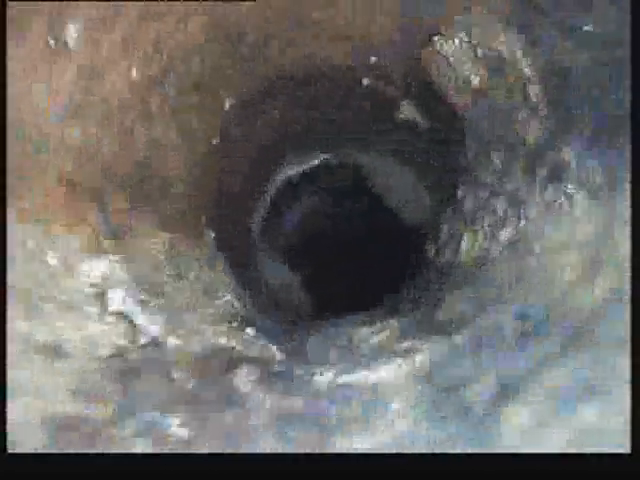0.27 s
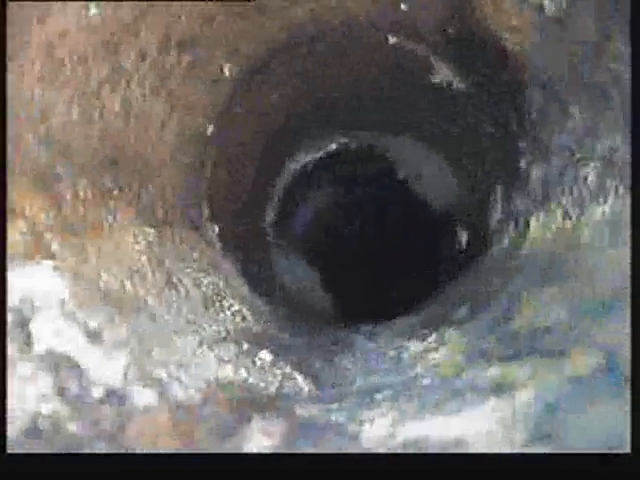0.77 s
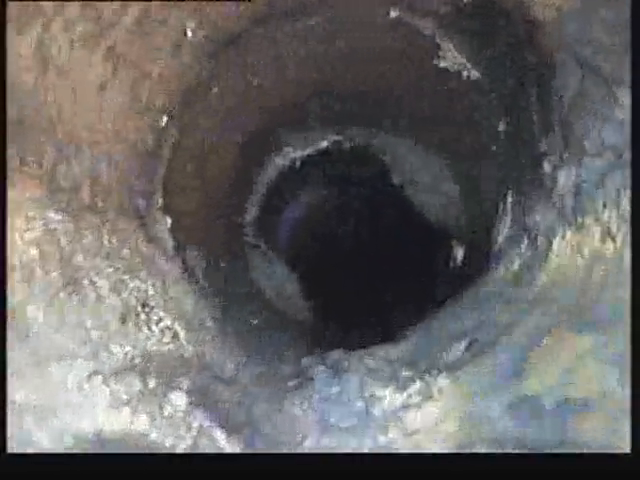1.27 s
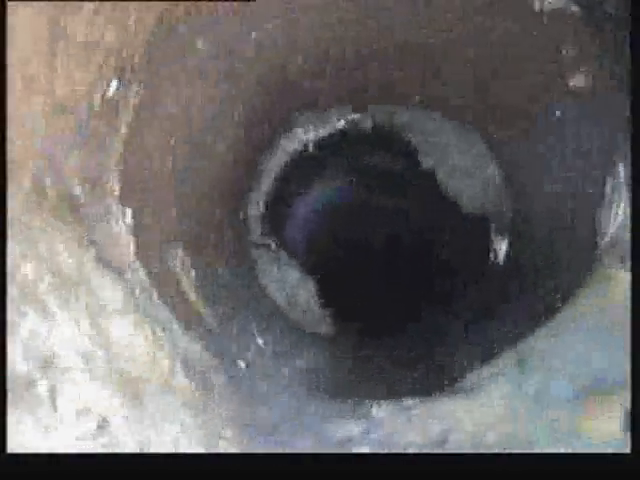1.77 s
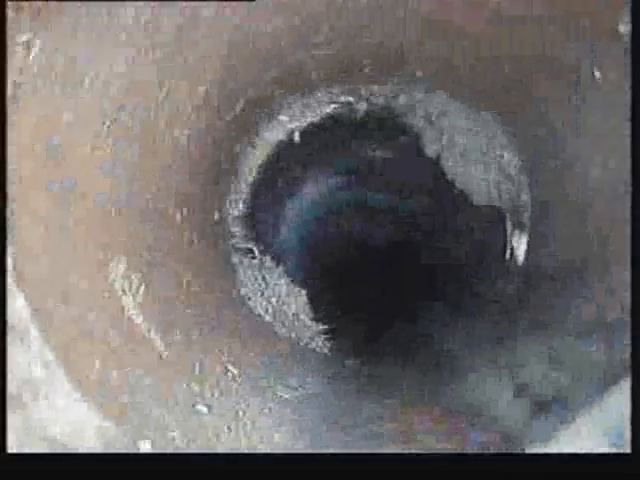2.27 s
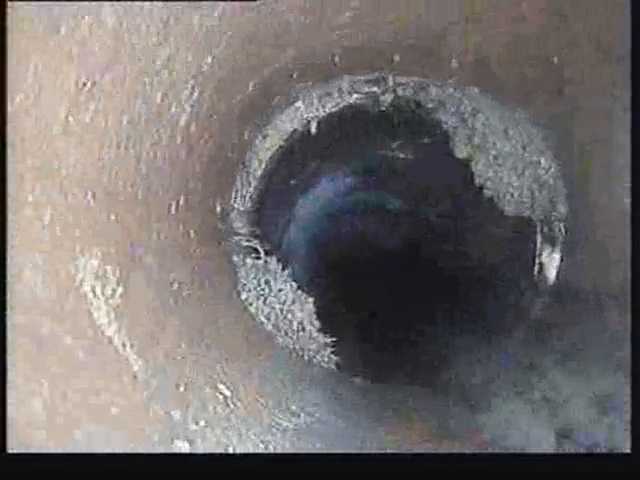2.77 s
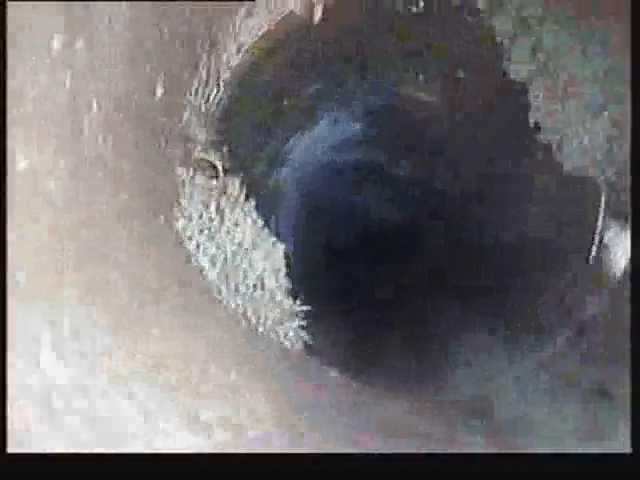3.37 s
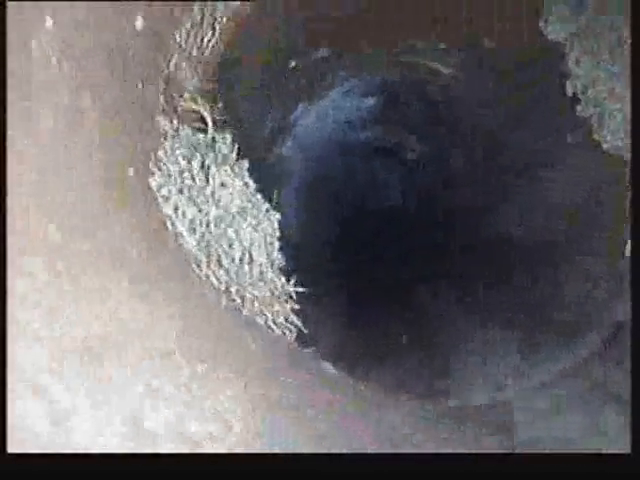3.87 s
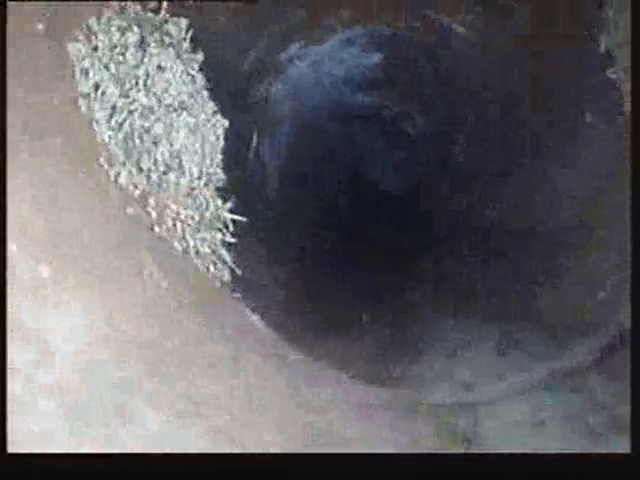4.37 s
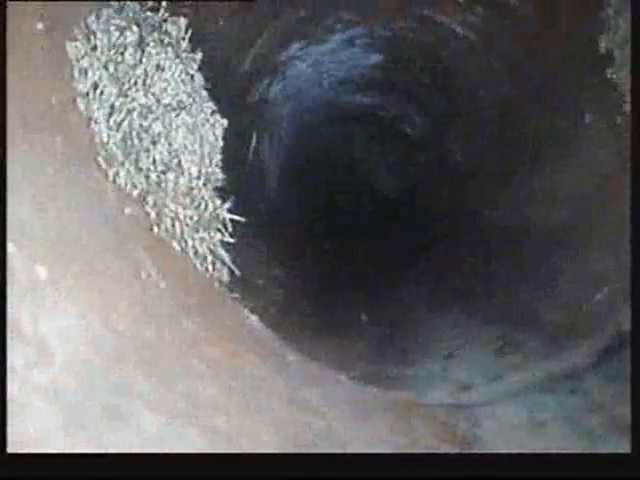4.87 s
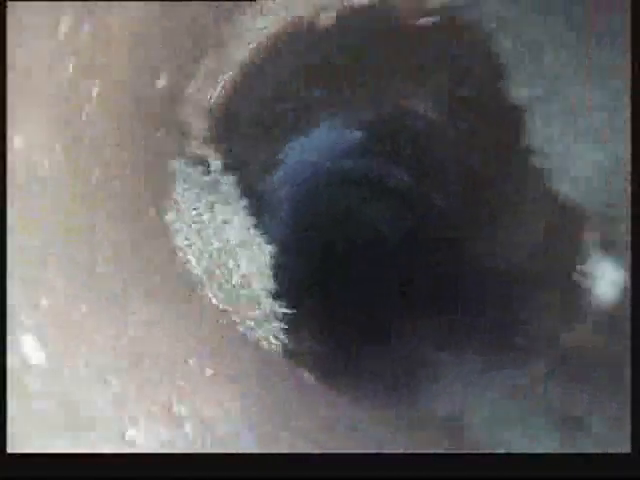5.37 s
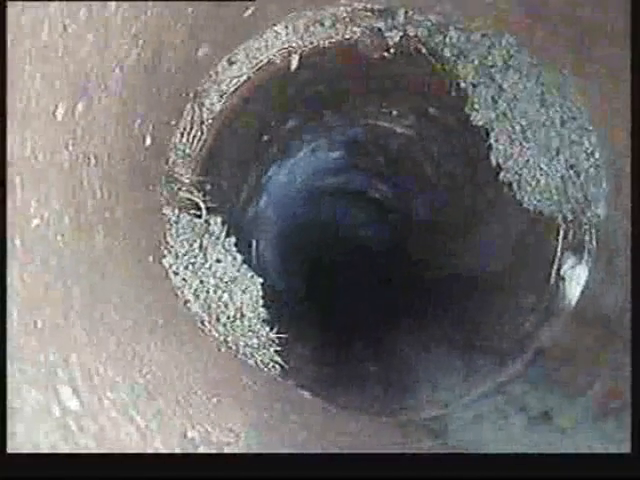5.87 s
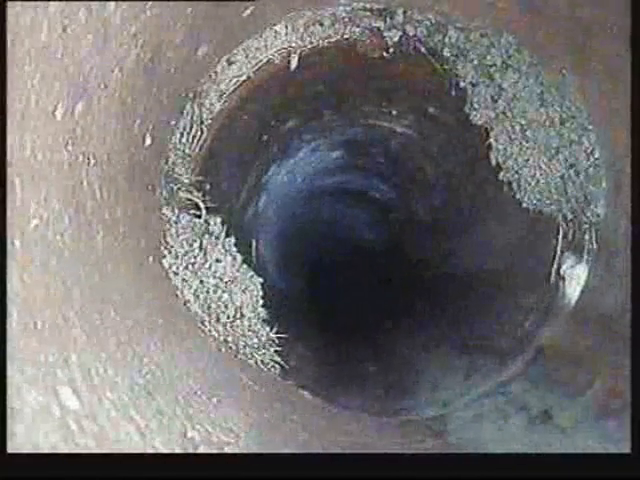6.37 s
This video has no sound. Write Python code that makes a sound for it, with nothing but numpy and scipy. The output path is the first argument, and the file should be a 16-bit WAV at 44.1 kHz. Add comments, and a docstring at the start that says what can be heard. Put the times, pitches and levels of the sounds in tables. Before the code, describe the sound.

Inside a pipe-inspection camera, only electrical leakage is heard: a thin high whine holds nearly steady over soft hiss and a faint buzzy bed of tones. Two or three times a second it drops briefly in a stuttering chirp. Tiny clicks patter rapidly. Later the whine roughens into a fast flutter. Everything is very quiet, dry, and direct, with no room, water or scraping.

```python
"""Inside a pipe-inspection camera, at its audio input: electrical leakage only, nothing acoustic, so no distance.
A switching supply whines and sags in pitch whenever the electronics draw current, in bursts and once a frame.
A digital tick train folds down into thin lines, beside lone steady clock tones; each line is a summed sine.
Picture fields click as short spikes, faint low noise comes and goes in short swells, and shaped noise
hisses on a DC offset."""
import sys
import numpy as np
from scipy import signal
from scipy.fft import rfft, irfft, next_fast_len
from scipy.io import wavfile
from scipy.ndimage import uniform_filter1d

SR = 44100
rng = np.random.default_rng(int(sys.argv[2]) if len(sys.argv) > 2 else 0)


def output_pcm(signal):
    """Save a mono or channel-first signal as 16-bit PCM at the path in sys.argv[1].

    Samples are clipped to [-1, 1] before scaling.
    """
    pcm = np.clip(np.atleast_2d(signal).T, -1, 1) * 32767
    wavfile.write(sys.argv[1], SR, np.round(pcm).astype(np.int16))


N = 292414

# The supply's drift. Each row: time in seconds, pitch at rest in Hz before any rebound,
# basic sag under the load of each frame in Hz (below zero counts as none).
SUPPLY_DRIFT = [(0, 2577, -0.5), (.8, 2588, 0), (.86, 2598, 0.5), (1.1, 2606, 0), (1.17, 2614, 0.5),
                (1.48, 2611, 0), (1.92, 2612, 0), (1.98, 2620, 0), (2.36, 2627, 0), (2.72, 2624, 0),
                (2.78, 2640, 18), (3.36, 2663, 32), (3.65, 2661, 16), (4.26, 2660, 33), (4.76, 2666, 29.5),
                (5.16, 2676, 46), (5.45, 2677, 72), (5.96, 2685, 88), (6.14, 2676, 122),
                (6.63, 2640, 114.5)]
# Bursts of heavy load, three equal steps each. Each row: start in seconds, length in ms,
# share of its load (0-1) that a step draws at first, full sag of steps one, two and three in Hz before stutter,
# extra sag of the frames just after in Hz.
LOAD_BURSTS = [(-0.0025, 34.0, 0.55, 99, 13.0, 136, 0.0), (0.368, 31.0, 0.37, 17.0, 150, 73, -2),
               (0.81, 34.0, 0.34, 163, 146, 114, 0.5), (1.119, 33.0, 0.7, 155, 6.1, 125, -0.5),
               (1.494, 37.0, 0.85, 43, 116, 11.8, 0.0), (1.93, 34.0, 0.12, 160, 196, 217, 0.5),
               (2.3724, 33.0, 0.65, 77.0, 212.0, 118, -1), (2.733, 31.5, 0.84, 80, 185, 95.0, 3.0),
               (3.0104, 32.5, 0.4, 300, 230, 280, 26.0), (3.3694, 34.5, 0.83, 160, 209.0, 186.0, 35.5),
               (3.813, 31.0, 0.85, 111.0, 247.0, 133.0, 12.0), (4.2755, 35.5, 0.87, 223.0, 76, 173, 32.0),
               (4.7724, 36.5, 0.71, 200, 251.0, 134, 30.0), (5.1713, 37.5, 0.84, 135, 288.0, 65, 30.0),
               (5.685, 35.0, 0.55, 213, 230, 300, 24.0), (5.9715, 34.5, 0.85, 192.0, 260.0, 261.0, 5.0),
               (6.2743, 36.0, 0.9, 271.0, 185, 224, 0.5), (6.569, 34.0, 0.7, 260, 240, 270.0, 0.0)]
# Partials of the whine and its beats with fixed clocks. Each row: multiple of the pitch, clock in Hz.
WHINE_PARTIALS = [(1, 0), (2, 0), (3, 0), (-1, 12100.6), (-2, 12100.6), (1, 3897.6), (-1, 3897.6),
                  (1, 7799.2), (1, 8197.9), (-1, 11702), (-2, 16000.2), (1, 4300.3)]
# Level of each partial in dB rms, before the flicker.
PARTIAL_DB = [-48.5, -67, -81, -70.5, -103, -74, -73.5, -78, -78, -81, -73, -88]
# The tick harmonics fold into combs. Each entry: the shift of one comb in Hz.
COMB_SHIFT_HZ = [0, 68.6, 197.2, 211.2, 110.2, 96.4]
# Line levels along each comb, one list per comb. Each row: frequency in Hz, level in dB rms.
COMB_SHAPES = [
    [(250, -73), (550, -73), (1100, -78), (1600, -86), (2200, -86)],
    [(300, -83), (600, -80), (1700, -82), (2300, -84), (3500, -86), (4000, -88)],
    [(190, -75), (500, -77), (800, -80), (1300, -80), (3100, -82), (5000, -89)],
    [(200, -82), (2900, -81), (3700, -81), (4200, -74), (4750, -79), (5000, -86), (5250, -80), (5500, -82),
     (6900, -83), (9000, -91)],
    [(7000, -90), (8300, -87), (10000, -88), (11200, -89), (11700, -85), (12100, -91), (12600, -94)],
    [(6700, -88), (7300, -90), (7800, -86), (8700, -92)],
]
# Lone steady clock tones. Each entry: frequency in Hz.
CLOCK_TONE_HZ = [325.8, 375, 400, 750, 1125, 1342.7, 4000.6, 5440.6, 5681.6, 6056.6, 8198.4, 9945.7,
                 10561.8]
# Level of each clock tone in dB rms.
CLOCK_TONE_DB = [-82.5, -73.5, -84, -79.5, -86, -81, -83, -76, -87, -75, -81, -78.5, -89]
# Spectrum of the hiss. Each row: frequency in Hz, relative density in dB per Hz.
HISS_SPECTRUM = [(60, -30), (85, 1), (150, -55), (190, 1.5), (400, 0), (1000, -2.5), (2000, -2.5),
                 (4000, -4), (7000, -6), (10000, -10.5), (12000, -11.5), (12700, -15)]
# Short swells of faint low noise, most of them near the bursts.
# Each row: centre in seconds, level at the centre in dB rms.
LOW_NOISE_SWELLS = [(.03, -65), (.38, -70), (.83, -61), (1.14, -60), (1.51, -58.5), (1.96, -62),
                    (2.17, -68), (2.39, -58.5), (2.76, -68), (2.89, -72), (3.03, -62), (3.39, -66),
                    (3.5, -62), (3.85, -63), (4.29, -69), (4.42, -69), (4.78, -61.5), (4.92, -68),
                    (5.18, -62.5), (5.59, -68), (5.72, -70.5), (5.99, -65), (6.29, -61), (6.47, -65),
                    (6.59, -62)]

FRAME_S, FRAME_START_S = .04, .0085
# A frame's load is a long task, a pause and a short task (mean share of the frame, its spread, then shares).
LONG_TASK, LONG_TASK_SPREAD, PAUSE, SHORT_TASK = .45, .0588, .066, .09
WEIGHT_SPREAD = .219  # how much the load differs from frame to frame (share)
RIPPLE_HZ, RIPPLE_SHARE = 94.3, .29
SETTLE_S, JITTER_HZ = .00039, 14.4  # length of each load smoothing; rms wander of the pitch
FULL_LOAD_FROM = .6  # a burst step draws its full load after this point (share of the step)
STUTTER_LO_HZ, STUTTER_HI_HZ, STUTTER_SHARE = 90, 300, .33
# After a burst the whine rests higher and the frames weigh differently; both fade.
REBOUND_HZ, REBOUND_S, BACKLOG_S = 14, .22, .16
WHINE_FLICKER_DB = .33
TICK_HZ, TICK_START_S, TICK_SCATTER_DB = 265.772, .00094, -43
HISS_DB, HISS_FLICKER_DB = -56.5, 1.5  # rms before the flicker; rms of the flicker
# Click heights are in dB of full scale, ahead of the top cut.
FIELD_HZ, FIELD_START_S = 59.949, -.0002
FIELD_DB, FIELD_SCATTER_DB = -51, 5.5
# A field clicks loudly on one part of the tick cycle (shares), most so at the top of a slow cycle.
LOUD_FROM, LOUD_TO = .63, .835
LOUD_DB, LOUD_SWELL_DB, LOUD_SCATTER_DB = -42.5, 8, 1.4
SWELL_S, SWELL_TOP_S = 1.0009, .42
LEAD_SHARE, LEAD_S = .19, .0002  # size and lead of the spike ahead of each click
LOW_SWELL_S, LOW_NOISE_LO_HZ, LOW_NOISE_HI_HZ = .018, 76, 258
OFFSET = .0284  # share of full scale
TOP_HZ = 12760


def undb(db):
    """Decibels to gain."""
    return 10 ** (np.asarray(db) / 20)


def level(x, db):
    """Scale to an rms level in dB."""
    return x * undb(db) / np.sqrt(np.mean(x ** 2))


def band(x, lo_hz, hi_hz):
    """Band-pass with second-order slopes."""
    return signal.sosfilt(signal.butter(2, [lo_hz, hi_hz], "band", fs=SR, output="sos"), x)


def band_noise(lo_hz, hi_hz):
    """Random wander within a band, at an rms of one."""
    return level(band(rng.standard_normal(N), lo_hz, hi_hz), 0)


def spikes(times, sizes):
    """One impulse at each time."""
    out = np.zeros(N)
    samples = np.clip((np.asarray(times) * SR).astype(int), 0, N - 1)
    np.add.at(out, samples, sizes)
    return out


def tone(phase, db):
    """A sinusoid of given rms level."""
    return np.sqrt(2) * undb(db) * np.cos(phase)


def burst_sag(t):
    """Sag in Hz under the bursts: each step starts on part of its load, bites fully at its end, and stutters."""
    sag_hz = np.zeros(N)
    for start, ms, first_share, *steps_hz, _ in LOAD_BURSTS:
        step, place = np.divmod((t - start) / ms * 1000 * len(steps_hz), 1)
        share = np.where(place > FULL_LOAD_FROM, 1, first_share)
        sag_hz += share * sum(hz * (step == k) for k, hz in enumerate(steps_hz))
    return sag_hz * (1 + STUTTER_SHARE * band_noise(STUTTER_LO_HZ, STUTTER_HI_HZ))


def since_burst(t):
    """Seconds since the last burst ended, and the extra sag in Hz that it left to the frames."""
    rows = [(-np.inf, 0)]  # no burst has ended yet
    rows += [(start + ms / 1000, row[-1]) for start, ms, *row in LOAD_BURSTS]
    ends, extra_hz = np.transpose(rows)
    last = np.searchsorted(ends, t) - 1
    return t - ends[last], extra_hz[last]


def load_sag(t, frame_hz):
    """How far load pulls the pitch down: the rippling tasks of every frame, or a burst where that is heavier."""
    frame, place = np.divmod((t - FRAME_START_S) / FRAME_S + 1, 1)
    frame_chance = rng.standard_normal((int(frame[-1]) + 1, 2))
    chance = frame_chance[frame.astype(int)].T
    long_end = LONG_TASK + LONG_TASK_SPREAD * chance[0]
    weight = 1 + WEIGHT_SPREAD * chance[1]
    short_start = long_end + PAUSE
    in_short = (place > short_start) & (place < short_start + SHORT_TASK)
    tasks = (place < long_end) | in_short
    ripple = 1 + RIPPLE_SHARE * band_noise(RIPPLE_HZ / 1.273, RIPPLE_HZ * 1.376)
    load = np.maximum(frame_hz * weight * tasks * ripple, burst_sag(t))
    settle = max(int(SETTLE_S * SR), 1)
    return uniform_filter1d(uniform_filter1d(load, settle), settle)


def supply_whine(t):
    """The supply's pitch drifts, sags under load and rebounds; its partials also beat with fixed clocks."""
    times, rest_hz, frame_hz = np.transpose(SUPPLY_DRIFT)
    since, extra_hz = since_burst(t)
    jitter = JITTER_HZ * band_noise(21, 260)
    rest = np.interp(t, times, rest_hz) + REBOUND_HZ * np.exp(-since / REBOUND_S)
    frames = np.maximum(np.interp(t, times, frame_hz), 0)
    frames = frames + extra_hz * np.exp(-since / BACKLOG_S)
    pitch = rest - load_sag(t, frames) + jitter
    phase = 2 * np.pi * np.cumsum(pitch) / SR
    whine = np.zeros(N)
    for (multiple, clock_hz), db in zip(WHINE_PARTIALS, PARTIAL_DB):
        whine += tone(multiple * phase + 2 * np.pi * clock_hz * t, db)
    return whine * undb(WHINE_FLICKER_DB * band_noise(2.5, 61))


def ticks(t):
    """Each comb is in phase at the ticks, so their sum is a click train of ever-changing sign and size."""
    out = np.zeros(N)
    for shift, shape in zip(COMB_SHIFT_HZ, COMB_SHAPES):
        hz, db = np.transpose(shape)
        turn = 2 * np.pi * (shift * t + rng.random())  # shared by the whole comb
        for k in range(int(hz[0] / TICK_HZ), int(hz[-1] / TICK_HZ) + 1):
            line_hz = max(k * TICK_HZ + shift, 1)
            if .9 * hz[0] <= line_hz <= 1.02 * hz[-1]:
                line_db = np.interp(np.log(line_hz), np.log(hz), db)
                out += tone(2 * np.pi * k * TICK_HZ * (t - TICK_START_S) + turn, line_db)
    times = np.arange(TICK_START_S, N / SR, 1 / TICK_HZ)
    scatter = spikes(times, rng.standard_normal(len(times)))
    return out + undb(TICK_SCATTER_DB) * scatter


def clock_tones(t):
    """Steady sines from clocks that belong to no comb."""
    return sum(tone(2 * np.pi * (hz * t + rng.random()), db) for hz, db in zip(CLOCK_TONE_HZ, CLOCK_TONE_DB))


def hiss():
    """Amplifier noise, falling towards the treble, with a quick flicker in level."""
    hz, db = np.transpose(HISS_SPECTRUM)
    size = next_fast_len(N)
    bins = np.maximum(np.arange(size // 2 + 1) * SR / size, 1)
    shape = undb(np.interp(np.log(bins), np.log(hz), db))
    noise = irfft(rfft(rng.standard_normal(size)) * shape, size)[:N]
    return level(noise, HISS_DB) * undb(HISS_FLICKER_DB * band_noise(1.7, 174))


def field_clicks():
    """A weak click at every picture field, loud where a field falls just ahead of a tick; a smaller spike leads
    each."""
    fields = np.arange(1, int(N / SR * FIELD_HZ)) / FIELD_HZ + FIELD_START_S
    chance = rng.standard_normal((len(fields), 3)).T
    place = (fields - TICK_START_S) * TICK_HZ % 1  # within the tick cycle
    swell = np.cos(2 * np.pi * (fields - SWELL_TOP_S) / SWELL_S)
    weak_db = FIELD_DB + FIELD_SCATTER_DB * chance[2]
    loud_db = LOUD_DB + LOUD_SWELL_DB * swell + LOUD_SCATTER_DB * chance[2]
    db = np.where((place > LOUD_FROM) & (place < LOUD_TO), loud_db, weak_db)
    times = fields + .0003 * chance[0]  # jitter in seconds
    sizes = np.sign(chance[1]) * undb(db)
    clicks = spikes(times, sizes) + spikes(times - LEAD_S, LEAD_SHARE * sizes)
    return uniform_filter1d(clicks, size=3) * 3  # three samples wide at full height


def low_noise_swells(t):
    """Faint low noise, band-passed twice, comes and goes in short bell-shaped swells."""
    noise = band_noise(LOW_NOISE_LO_HZ, LOW_NOISE_HI_HZ)
    low = level(band(noise, LOW_NOISE_LO_HZ, LOW_NOISE_HI_HZ), 0)
    swells = sum(undb(db) * np.exp(-.5 * ((t - s) / LOW_SWELL_S) ** 2) for s, db in LOW_NOISE_SWELLS)
    return low * swells


def scene():
    """All layers add at the input, one channel."""
    t = np.arange(N) / SR
    mix = supply_whine(t) + ticks(t) + clock_tones(t) + hiss() + field_clicks() + low_noise_swells(t)
    return mix[None]


def record(dry):
    """The converter cuts the top steeply and sits on a DC offset."""
    top_cut = signal.ellip(16, .3, 60, TOP_HZ, fs=SR, output="sos")  # .3 dB ripple, 60 dB down
    return signal.sosfilt(top_cut, dry) + OFFSET


dry = scene()
out = record(dry)
output_pcm(out)
```